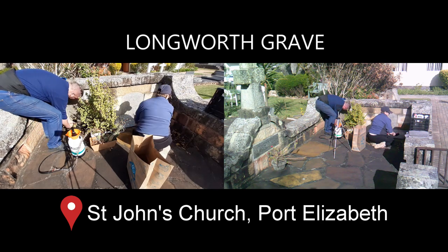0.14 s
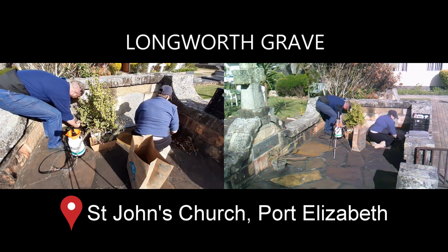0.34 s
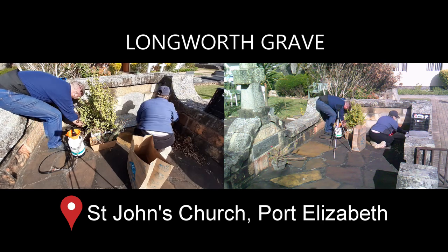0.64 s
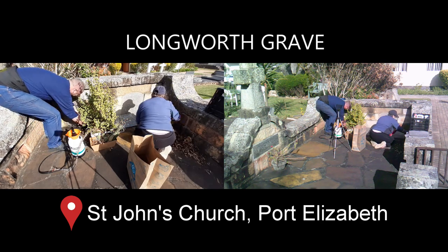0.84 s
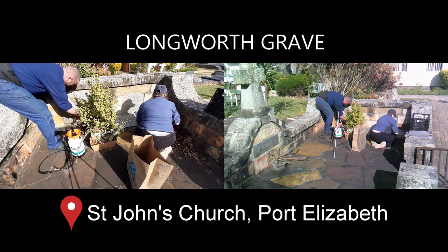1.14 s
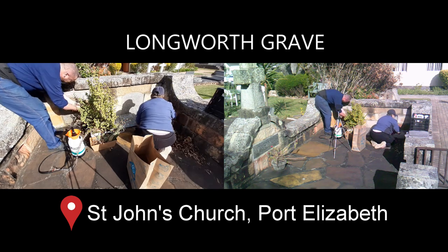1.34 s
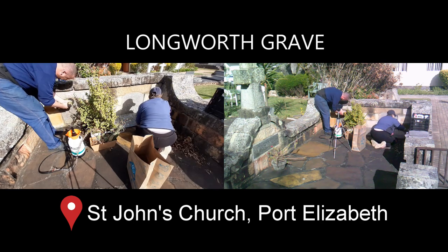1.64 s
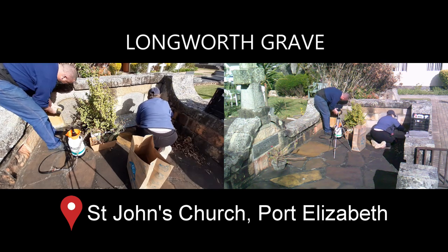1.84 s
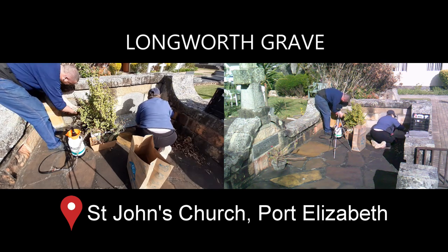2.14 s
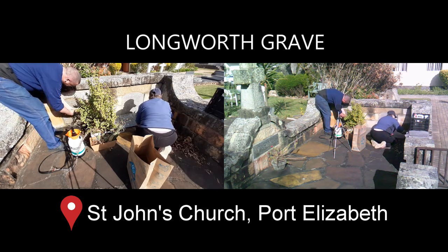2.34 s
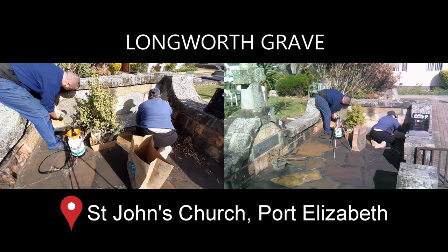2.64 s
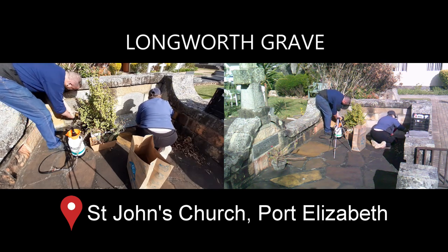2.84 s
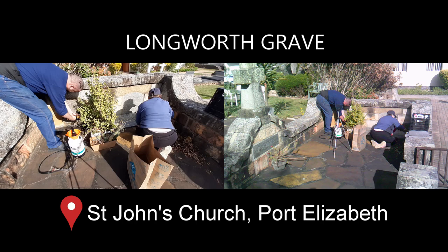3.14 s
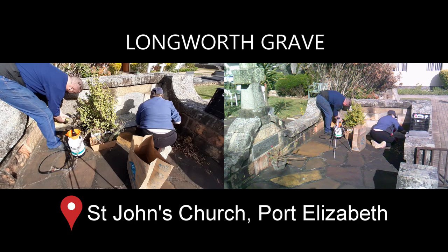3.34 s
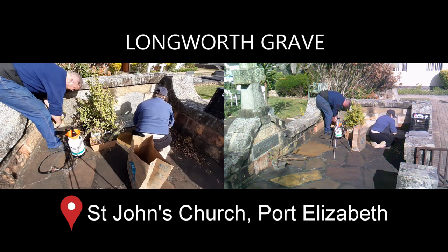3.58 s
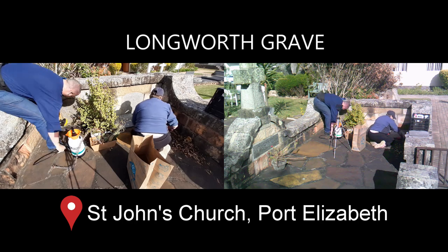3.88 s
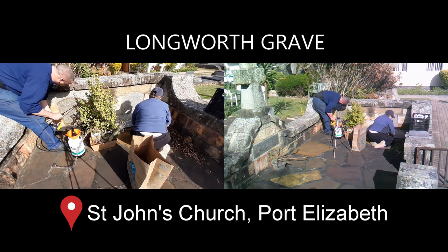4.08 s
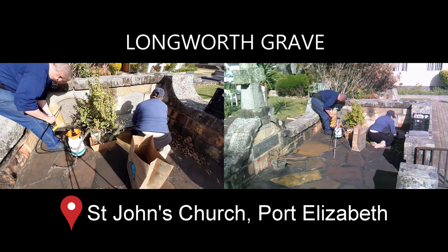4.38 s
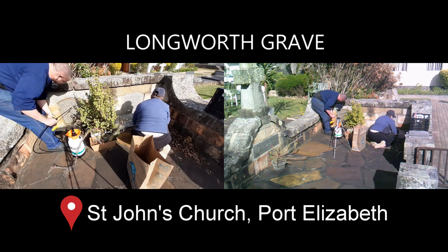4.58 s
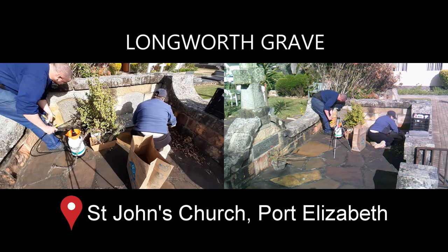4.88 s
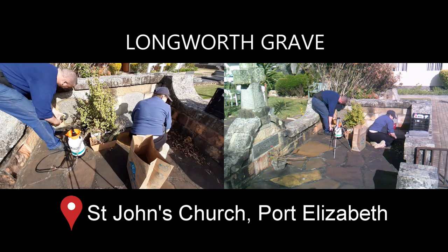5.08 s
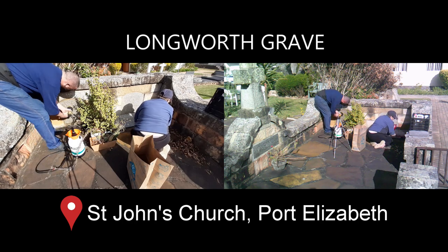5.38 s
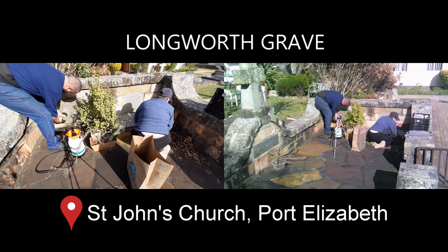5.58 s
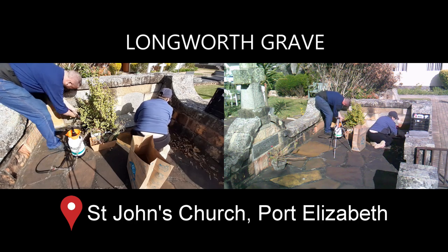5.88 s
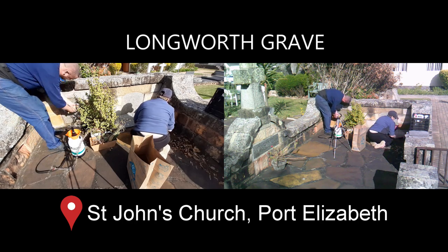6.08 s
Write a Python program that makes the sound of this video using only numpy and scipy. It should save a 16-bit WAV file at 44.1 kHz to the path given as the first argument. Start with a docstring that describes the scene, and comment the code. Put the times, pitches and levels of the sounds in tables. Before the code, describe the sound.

From 0 s a small geared electric tool is already running close by outdoors: a nasal hum near 900 Hz, a piercing gear whine near 2.8 kHz and its octave, wrapped in broad bright hiss. Pitch dips and wavers by several percent as it bears on the work, and the tone flickers roughly and shifts between left and right. A dull hollow knock lands around 1 s. From about 1.9 to 2.8 s a faint distant engine climbs in pitch. At 3.55 s the switch clicks and the tool dies within a tenth of a second. From 3.75 to 5.25 s dry bristles fizz and scrape stone in short strokes, strongest late, with small clicks and knocks near 5 s. At 5.29 s the tool clicks on, leaps up to speed and whines until 6.2 s, with soft hollow knocks. Low traffic rumble continues throughout; nearby walls add a very short, dull tail.

```python
"""Geared tool in a walled yard

A small geared electric tool whines (sines at multiples of its shaft speed) and hisses (coloured noise);
it stops and starts again. In the pause bristles brush over stone (gestures of noise); the switch clicks
(noise bursts) and things get knocked (ringing modes). Far traffic rumbles as slow-swelling noise and an
engine pulls away on rising harmonics. Two microphone ports hear it; walls add a tail to hiss and handling."""
import sys
import numpy as np
from scipy import signal
from scipy.fft import rfft, irfft
from scipy.io import wavfile
from scipy.ndimage import uniform_filter1d

SR = 44100
rng = np.random.default_rng(int(sys.argv[2]) if len(sys.argv) > 2 else 0)


def dump(signal):
    """Clip the signal to [-1, 1] and save it as 16-bit WAV at the path in sys.argv[1]."""
    limited = np.clip(np.atleast_2d(signal).T, -1, 1)
    pcm = np.round(limited * 32767).astype(np.int16)
    wavfile.write(sys.argv[1], SR, pcm)


N = 274302

# one table per run of the tool, its speed sagging under load: start_s, hum_hz
SPEED_RUNS = [
    [(0.0, 961), (0.015, 958), (0.065, 930), (0.1, 890), (0.115, 878), (0.13, 882), (0.15, 890),
     (0.195, 886), (0.229, 911), (0.269, 890), (0.314, 911), (0.359, 899), (0.399, 925), (0.454, 906),
     (0.504, 941), (0.529, 953), (0.559, 963), (0.579, 954), (0.609, 960), (0.683, 940), (0.893, 923),
     (1.003, 907.5), (1.043, 916), (1.102, 912), (1.137, 919), (1.172, 897), (1.222, 888), (1.302, 892),
     (1.352, 888), (1.407, 903), (1.432, 903), (1.482, 891.5), (1.527, 880), (1.551, 876), (1.656, 876),
     (1.671, 889), (1.761, 879), (1.826, 898), (1.896, 886), (1.966, 864), (2.0, 819), (2.035, 851),
     (2.065, 854), (2.08, 842), (2.115, 858), (2.135, 841), (2.22, 839), (2.24, 869), (2.28, 880),
     (2.385, 849), (2.42, 845), (2.464, 844.4), (2.484, 811), (2.504, 815), (2.554, 830), (2.584, 877),
     (2.594, 876), (2.604, 869), (2.629, 834), (2.644, 826), (2.654, 836), (2.674, 876), (2.684, 889),
     (2.714, 887), (2.764, 852), (2.789, 852), (2.809, 851), (2.834, 879.5), (2.873, 858), (2.888, 870),
     (2.903, 890), (2.948, 882), (2.968, 904), (2.988, 920), (3.028, 888), (3.073, 913), (3.138, 874),
     (3.218, 868), (3.263, 855), (3.317, 864.6), (3.357, 840.5), (3.397, 859), (3.417, 888), (3.447, 887),
     (3.497, 928), (3.517, 960), (3.527, 960), (3.56, 922)],
    [(5.292, 596), (5.302, 703), (5.312, 855), (5.333, 944), (5.348, 950), (5.363, 919), (5.383, 915),
     (5.408, 928), (5.428, 905), (5.448, 899), (5.478, 907), (5.498, 871), (5.507, 863), (5.522, 862),
     (5.547, 878), (5.587, 882), (5.617, 906), (5.687, 895.5), (5.717, 862), (5.742, 843), (5.762, 861),
     (5.787, 851), (5.852, 881), (5.907, 871), (5.932, 884), (5.966, 876), (5.986, 901), (6.016, 881),
     (6.036, 849), (6.066, 881.6), (6.086, 858), (6.106, 882), (6.121, 897), (6.131, 920), (6.156, 911),
     (6.181, 891), (6.22, 900)],
]
# the tool moves across the microphone: start_s, port_delay_ms, hum_lean_db (positive leans right)
PORT_PATH = [(0, 0.23, -7), (.3, 0.19, 2), (.6, 0.15, -1), (.9, 0.15, 3), (1.2, 0.16, 1), (1.5, .17, 5),
             (1.72, 0.21, -2), (1.9, 0.25, 10), (2.07, .21, -4), (2.25, 0.13, -8), (2.57, 0.27, 0.67),
             (2.73, 0.23, 3), (2.9, 0.17, -1), (3.06, 0.14, 1), (3.23, 0.22, 1.5), (3.56, 0.24, -4),
             (5.3, 0.22, -2), (5.47, 0.23, 3), (5.65, 0.26, 9), (5.9, 0.15, 7), (6.0, 0.23, 13),
             (6.06, 0.25, 10), (6.14, 0.091, -4), (6.22, 0.17, -1)]
TEETH, HUM_ORDER = 28, 9  # shaft orders of the gear mesh and of the hum
USUAL_HUM_HZ, USUAL_LAG_MS = 885, .19
STOP_S, RUN_DOWN_S, RUN_DOWN_DB = 3.558, 0.083, -20.5
START_S, RUN_UP_S = 5.288, 0.012
PATCHY_DB = .8  # drifting patches in the hiss and the fizz


def amp(db):
    """Decibels to gain."""
    return 10 ** (np.asarray(db) / 20)


def evened(x):
    """Scales to rms 1."""
    return x / np.sqrt(np.mean(x ** 2) + 1e-20)


def read(points, hz):
    """Reads a spectrum on a log-frequency axis."""
    f, value = np.transpose(points)
    return np.interp(np.log(hz + 1), np.log(f + 1), value)


def columns(tables, t):
    """Every column of the joined tables at times t."""
    s, *cols = np.concatenate(tables).T
    return [np.interp(t, s, c) for c in cols]


def running(tables, t, fade):
    """1 inside each table's span, fading at its ends, except at time 0 and at the end of the last table."""
    total = 0
    for table in tables:
        first_s, last_s = table[0][0], table[-1][0]
        since = t - first_s + fade * (first_s == 0)
        left = last_s - t + fade * (table is tables[-1])
        total = total + np.clip(np.minimum(since, left) / fade, 0, 1)
    return total


def wander(count, length):
    """Slow chance of rms 1, smoothed twice over length samples."""
    return evened(uniform_filter1d(uniform_filter1d(rng.standard_normal(count), length), length))


def noise(gain, same, patchy_db, size=512):
    """Two-channel noise of a given short-time gain and likeness, with drifting patches; gain 1 gives rms 1."""
    shape = (size // 2 + 1, 4 * N // size + 5)
    a, b, c, d, patches = rng.standard_normal(shape[::-1] + (5,)).T
    patches = uniform_filter1d(patches, size=6, axis=0)
    patches = evened(uniform_filter1d(patches, size=16, axis=1))
    same = np.clip(same, -1, 1)
    mid = np.sqrt(1 + same) * (a + 1j * b)
    side = np.sqrt(1 - same) * (c + 1j * d)
    z = np.array([mid + side, mid - side]) * amp(patchy_db * patches)
    plain = signal.istft(z[0], nperseg=size, noverlap=size * 3 // 4)[1]
    shaped = signal.istft(z * gain, nperseg=size, noverlap=size * 3 // 4)[1]
    return shaped[:, :N] / plain.std()


def add(mix, s, sound, pan_db):
    """Mixes a short sound in at s seconds; positive pan is louder on the left."""
    part = mix[:, round(s * SR):][:, :len(sound)]
    part += sound[:part.shape[1]] * amp([[pan_db / 2], [-pan_db / 2]])


def gestures(rows, t, rise, fall):
    """Summed envelopes: rise, hold, fall."""
    total = 0
    for s, length, db in rows:
        opening = np.clip((t - s) / rise, 0, 1)
        closing = np.exp(-np.maximum(t - s - length + 2 * fall, 0) / fall)
        total = total + amp(db) * opening * closing
    return total


def whine(flutter, jitter, flicker_db):
    """Shaft orders as sines; the shaft speed flutters and jitters, and each weak order comes and goes."""
    # main tones before run-down and slack: start_s, hum_db, mesh_db, octave_db,
    # strand_db (upper strand beside the mesh octave), half_mesh_db
    tone_levels = [(0.0, -47, -43.0, -52, -48.5, -70.5), (0.07, -43.5, -39, -47, -42, -66),
                   (0.14, -50, -53, -36.0, -40.0, -74), (0.21, -44, -45, -38.5, -45.0, -64),
                   (0.28, -47, -40, -35.5, -46, -60), (0.35, -46, -41.0, -38, -44.5, -48),
                   (0.42, -45.5, -43.5, -39, -40, -55.5), (0.49, -47.5, -38.0, -41, -41, -52),
                   (0.56, -53, -46, -44, -43, -51), (0.63, -50, -46, -38, -42.0, -59),
                   (0.7, -46.5, -44.5, -40.5, -38, -64), (0.77, -51, -43, -41.5, -46.0, -55),
                   (0.84, -47.5, -38, -39, -46, -51), (0.91, -49, -40.5, -45.5, -51, -71.0),
                   (0.98, -41, -41, -39, -46.0, -52), (1.05, -39, -37, -49, -40, -56),
                   (1.12, -37, -45.5, -44.5, -41, -52), (1.19, -40.0, -36, -42.5, -49.5, -54),
                   (1.26, -43.5, -47, -41.5, -51, -60), (1.33, -43.5, -43, -43, -47.0, -59),
                   (1.4, -41.5, -37, -46, -38, -50), (1.47, -37.5, -38.5, -44, -45, -49),
                   (1.54, -42.5, -40, -49, -52, -71.0), (1.61, -42.0, -44, -42, -52.0, -48),
                   (1.68, -39.5, -40.5, -43, -52, -52), (1.75, -54, -39, -42.0, -39, -53),
                   (1.82, -53, -38, -46, -45, -50), (1.89, -44.5, -41.5, -44, -44.5, -50),
                   (1.96, -42.5, -39, -41.0, -43.5, -52), (2.03, -49, -39, -42, -46, -60.0),
                   (2.1, -49.0, -43, -45, -41.0, -65.5), (2.17, -50.5, -40.5, -44, -46, -75.5),
                   (2.24, -47.5, -44, -45, -49.5, -56.5), (2.31, -41.5, -57, -43, -56, -59),
                   (2.38, -46.5, -45, -42, -51, -73.0), (2.45, -57, -43, -36, -42, -72.5),
                   (2.52, -46, -34, -40, -40.5, -62), (2.59, -46.5, -52, -43.0, -40, -58.5),
                   (2.66, -45, -45, -45, -50, -74.5), (2.73, -44.5, -41, -39, -42.0, -73.5),
                   (2.8, -52.5, -39.5, -38.5, -46, -72), (2.87, -42.5, -49, -40, -47, -71.0),
                   (2.94, -43.5, -43, -38, -39, -54.5), (3.01, -39, -42.5, -45, -49.0, -55),
                   (3.08, -40.5, -40, -37.0, -49, -54.5), (3.15, -42.5, -40.5, -38, -40, -61),
                   (3.22, -40.0, -46.5, -43, -42, -69), (3.29, -40.5, -37, -38.5, -40, -70.5),
                   (3.36, -46, -50.5, -35, -44.5, -58), (3.43, -38.5, -43.0, -38.5, -46.0, -73),
                   (3.5, -44.5, -43.5, -44.5, -49.5, -67), (5.3, -52.5, -41, -41, -54.5, -70),
                   (5.37, -49, -44.5, -48, -44.5, -51), (5.44, -42, -39.5, -44, -50.5, -49),
                   (5.51, -43.5, -40.5, -40.0, -51, -59.0), (5.58, -40.5, -42.5, -42, -54, -54.0),
                   (5.65, -41, -37, -47, -50, -57), (5.72, -44, -48, -45, -49.0, -61.5),
                   (5.79, -40.5, -32, -39, -45.0, -58), (5.86, -45, -44, -47, -54, -76.0),
                   (5.93, -47, -45, -49, -53, -72.0), (6.0, -47.5, -37.5, -47, -54, -56.0),
                   (6.07, -46.0, -40.5, -55, -53, -54), (6.14, -39, -41, -50, -51.0, -70.5),
                   (6.21, -41, -44.5, -60, -55.5, -59.0), (6.22, -31, -44.5, -54, -55.0, -60.5)]
    # phase by which the left leads: start_s, hum_turns, mesh_turns, octave_turns
    left_leads = [(0.0, -0.029, -0.04, -0.53), (0.07, -0.39, -0.14, 0.012), (0.14, -0.48, -0.19, 0.13),
                  (0.21, -0.46, -0.2, 0.01), (0.28, -0.51, -0.32, -0.0), (0.35, -0.41, -0.6, 0.0),
                  (0.42, -0.22, -0.81, -0.0), (0.49, -0.3, -0.54, -0.0), (0.56, -0.074, -0.22, 0.13),
                  (0.63, -0.22, -0.058, -0.15), (0.7, -0.13, 0.17, 0.0), (0.77, -0.28, 0.31, 0.036),
                  (0.84, -0.3, 0.41, 0.31), (0.91, -0.16, 0.78, 0.044), (0.98, -0.22, 0.53, 0.33),
                  (1.05, 0.01, 0.51, 0.47), (1.12, -0.17, 0.73, 0.26), (1.19, -0.14, 0.49, 0.15),
                  (1.26, 0.048, 0.58, -0.2), (1.33, -0.17, 0.47, 0.01), (1.4, -0.05, 0.21, -0.07),
                  (1.47, -0.11, 0.31, -0.2), (1.54, -0.19, 0.5, 0.24), (1.61, -0.26, 0.5, -0.41),
                  (1.68, -0.15, 0.84, 0.021), (1.75, -0.37, 0.67, -0.33), (1.82, -0.74, 0.37, -0.73),
                  (1.89, -0.56, 0.17, -0.37), (1.96, -0.79, 0.44, -0.11), (2.03, -0.88, 0.29, -0.12),
                  (2.1, -0.68, 0.65, 0.044), (2.17, -0.73, 0.29, -0.01), (2.24, -0.92, 0.29, 0.01),
                  (2.31, -0.79, 0.51, -0.16), (2.38, -0.72, 0.55, -0.034), (2.45, -1.06, 0.35, 0.0018),
                  (2.52, -0.82, 0.51, -0.05), (2.59, -0.81, 0.42, -0.16), (2.66, -0.095, 0.64, 0.0068),
                  (2.73, -0.23, 0.77, 0.28), (2.8, -0.021, 0.45, 0.0), (2.87, 0.4, 0.39, -0.015),
                  (2.94, 0.12, 0.62, 0.0), (3.01, 0.052, 0.71, -0.052), (3.08, 0.017, 0.26, 0.15),
                  (3.15, 0.27, 0.66, -0.06), (3.22, 0.25, 0.49, -0.058), (3.29, 0.19, 0.53, 0.094),
                  (3.36, 0.056, -0.035, -0.11), (3.43, 0.34, 0.25, 0.04), (3.5, 0.23, -0.0047, 0.31),
                  (5.3, 0.25, -0.31, -0.11), (5.37, -0.15, 0.22, 0.09), (5.44, -0.13, 0.77, -0.054),
                  (5.51, -0.22, 0.07, -0.061), (5.58, -0.34, -0.28, 0.18), (5.65, -0.19, -0.14, -0.17),
                  (5.72, -0.32, 0.23, -0.28), (5.79, -0.22, 0.4, -0.0049), (5.86, -0.21, 0.78, 0.01),
                  (5.93, -0.24, 0.21, 0.052), (6.0, -0.26, 0.65, -0.16), (6.07, -0.82, 0.64, 0.09),
                  (6.14, -0.78, 0.62, 0.13), (6.21, -0.78, 0.69, 0.089), (6.22, -0.74, 0.64, 0.03)]
    # weaker shaft orders below and around the mesh: order; level_db relative to the mesh
    near_mesh, near_mesh_db = [18, 26, 27, 29, 30, 31], [-20, -16, -14, -21, -16, -18]
    # orders around the second and third mesh multiple: order; level_db relative to the mesh octave
    near_octave, near_octave_db = [49, 52, 54, 60, 63, 64, 84, 86], [-14, -14, -10, -14, -14, -13, -10, -9]
    # orders that swell or fade with the load: order; level_db at usual speed, slope_db per 1% of sag
    loaded_orders, loaded_levels = [12, 13, 15, 16, 17, 21, 22, 3, 7, 4.5], [(-64.5, 0.29), (-63, 0), (-60.5, -0.12),
                                                           (-63.5, -0.5), (-59.5, 1.6), (-60.5, 0),
                                                           (-58, 0.38), (-70, 0.81), (-64.5, 0.39),
                                                           (-67.5, 0.67)]
    engaged_hum_hz, slack_db_per_hz = 840, .1  # at the start, gear tones are faint below this speed
    flutter_db_per_sag = .8  # more flutter under load: dB for each 1% of sag
    drift_turns = .2  # weak orders drift in phase between the ports
    hum_drift_db, mesh_drift_db, octave_drift_db = 1.5, 2.5, 2.5  # chance drift between left and right
    tone_wobble_db = 1.5
    grain_db, mesh_grain_db = 2.5, 1.5  # quick chatter of the gear tones

    t, side = np.arange(N) / SR, np.array([[.5], [-.5]])
    hum_hz = columns(SPEED_RUNS, t)[0]
    hum_db, mesh_db, octave_db, strand_db, half_db = columns([tone_levels], t)
    lag_ms, lean_db = columns([PORT_PATH], t)

    slack_db = slack_db_per_hz * np.maximum(engaged_hum_hz - hum_hz, 0) * (t > START_S)
    run_down = np.clip(1 - (STOP_S - t) / RUN_DOWN_S, 0, 1)
    slack_db -= RUN_DOWN_DB * run_down ** 2 * (t < START_S)
    mesh_db, octave_db, strand_db = mesh_db - slack_db, octave_db - slack_db, strand_db - slack_db

    sag = np.clip(100 * (1 - uniform_filter1d(hum_hz, size=6000) / USUAL_HUM_HZ), -8, 6)  # percent
    slow_flutter = flutter * amp(flutter_db_per_sag * sag) * wander(N, length=500)
    shaft_hz = hum_hz / HUM_ORDER * (1 + slow_flutter + jitter * wander(N, length=90))
    turns = np.cumsum(shaft_hz) / SR
    lead = shaft_hz * lag_ms / 1000  # shaft turns within the port delay

    def order(k, db, pan_db=0, ahead=None, wobble_db=flicker_db):
        """One sine at k times the shaft speed, wobbling in level."""
        if ahead is None:
            ahead = k * lead + drift_turns * wander(N, length=2000)
        phase = 2 * np.pi * (k * turns + side * ahead + rng.random())
        level_db = db + side * pan_db + wobble_db * wander(N, length=1200)
        return np.sqrt(2) * amp(level_db) * np.sin(phase)

    def grain(depth_db):
        """Chatter in dB."""
        return depth_db * wander(N, length=200)

    hum_ahead, mesh_ahead, octave_ahead = columns([left_leads], t)
    hum_pan = hum_drift_db * wander(N, length=3000) - lean_db
    mesh_pan = mesh_drift_db * wander(N, length=3000)
    octave_pan = octave_drift_db * wander(N, length=3000)
    out = order(HUM_ORDER, hum_db, hum_pan, hum_ahead, wobble_db=2.0)
    out += order(TEETH, mesh_db + grain(mesh_grain_db), mesh_pan, mesh_ahead, tone_wobble_db)
    out += order(2 * TEETH, octave_db + grain(grain_db), octave_pan, octave_ahead, tone_wobble_db)
    out += order(2 * TEETH + 2, strand_db + grain(grain_db), wobble_db=tone_wobble_db)
    out += order(TEETH / 2, half_db, wobble_db=tone_wobble_db)
    for k, db in zip(near_mesh, near_mesh_db):
        out += order(k, mesh_db + db)
    for k, db in zip(near_octave, near_octave_db):
        out += order(k, octave_db + db)
    for k, (db, slope_db) in zip(loaded_orders, loaded_levels):
        out += order(k, db + slope_db * sag)
    return out * running(SPEED_RUNS, t, fade=0.014)


def hiss():
    """Broad noise; arriving from left and right alike, the port delay combs its likeness."""
    # relative colour before humps and casing: pitch_hz, level_db per Hz
    hiss_colour = [(250, -15), (500, -17.5), (1000, -4), (1500, -2.5), (2300, -5), (3500, -1.5),
                   (5000, -3.5), (7300, -1.5), (10000, -2), (16000, 0)]
    # hiss gathers round the mesh: mesh_multiple, width_hz, level_db
    mesh_humps = [(.5, 420, -1.5), (1, 330, 5.5), (2, 2100, 1.5)]
    # resonances of the casing: pitch_hz, width_hz, level_db
    casing_modes = [(1620, 130, 3), (5500, 600, 4), (6650, 250, 2), (8550, 520, 5.5)]
    # share that is not diffuse: pitch_hz, share (0-1)
    alike_share = [(300, 1), (1500, 1), (3500, 1), (6500, 0.52), (9000, 0.01), (13000, .05)]
    base_db, db_per_ms = -30, 12  # louder when the tool points along the ports
    low_hold, low_most_db = 0.81, 17  # below 2 kHz it holds against level changes, up to a limit

    hz = np.fft.rfftfreq(512, 1 / SR)[:, None]
    t = np.arange(N // 128 + 5) * 128 / SR  # frame times
    mesh_hz = columns(SPEED_RUNS, t)[0] * TEETH / HUM_ORDER
    lag_ms = columns([PORT_PATH], t)[0]
    down = np.clip(1 - (STOP_S - t) / RUN_DOWN_S, 0, 1)
    up = np.maximum(t - START_S, 1e-4) / RUN_UP_S
    change_db = db_per_ms * (lag_ms - USUAL_LAG_MS)
    change_db += np.where(t < STOP_S, RUN_DOWN_DB * down ** 2, 20 * np.log10(1 - np.exp(-up)))
    low_db = np.minimum(-low_hold * change_db, low_most_db)

    colour_db = read(hiss_colour, hz) + low_db / (1 + (hz / 2000) ** 4)
    colour_db += sum(db * np.exp(-((hz - k * mesh_hz) / width) ** 2) for k, width, db in mesh_humps)
    colour_db += sum(db * np.exp(-((hz - mode) / width) ** 2) for mode, width, db in casing_modes)
    same = read(alike_share, hz) * np.cos(2 * np.pi * hz * lag_ms / 1000)
    on = (t < STOP_S) | (t > START_S)
    air = noise(amp(colour_db + base_db + change_db) * on, same, patchy_db=PATCHY_DB)
    return air * amp(0.4 * wander(N, length=25))  # ragged from one instant to the next


def brushing():
    """Bristles fizz in the treble; each stroke that bears down scrapes lower, starting more softly."""
    # sweeps of the bristles, before colouring: start_s, length_s, level_db
    sweep_rows = [(3.745, 0.19, -68), (3.856, 0.14, -55.5), (4.045, 0.75, -51), (4.75, 0.21, -48.5),
                  (4.91, 0.19, -61), (5.08, 0.16, -48), (5.255, 0.036, -52)]
    # strokes that bear down on the stone, before colouring: start_s, length_s, level_db
    stroke_rows = [(3.738, 0.22, -70.5), (3.848, 0.12, -69), (4.022, 0.085, -61), (4.22, 0.062, -59.5),
                   (4.32, 0.047, -66), (4.36, 0.12, -60), (4.533, 0.083, -59.5), (4.765, 0.081, -57),
                   (4.9, 0.092, -57), (4.966, 0.18, -70), (5.084, 0.13, -52), (5.203, 0.12, -73)]
    # relative colours of the two: pitch_hz, level_db per Hz
    fizz_colour, scrape_colour = [(2500, -31), (5000, -16.5), (8000, -10), (12000, 0), (16000, 1.5)], [(600, -18), (1500, -5.5), (2700, -1), (6000, -1.5),
                                                (9000, -2.5), (16000, -9)]

    t, hz = np.arange(N) / SR, np.fft.rfftfreq(512, 1 / SR)[:, None]
    sweep = gestures(sweep_rows, t, rise=.016, fall=0.033)
    press = gestures(stroke_rows, t, rise=0.023, fall=0.015)
    fizz = noise(amp(read(fizz_colour, hz) + 4.5), .05, patchy_db=PATCHY_DB)
    scrape = noise(amp(read(scrape_colour, hz) + 8.0), 0.045, patchy_db=-1.5)
    rough_db = 0.99 * wander(N, length=120) + 1.2 * wander(N, length=1800)
    return (sweep * fizz + press * scrape) * amp(rough_db)


def handling():
    """Knocks ring the hollow modes; clicks are short bursts of noise in the tool body."""
    # dull knocks on a hollow thing: start_s, peak_db before pan, pan_db (left over right)
    knock_rows = [(0.970, -29.5, 5), (1.019, -41, -1.5), (3.548, -44.5, 3), (5.499, -46, 3),
                  (5.796, -43, -8), (5.873, -42, -8), (6.063, -34.5, 5)]
    # modes of the hollow thing: pitch_hz, relative level_db, t60_s
    hollow_modes = [(253, -3.5, 0.097), (330, -13.5, .06), (454.3, -7.5, 0.12), (604, -1, .05),
                    (673, 3, 0.047), (713, 7.5, 0.1), (1520, -14, 0.066)]
    # scuffs and clicks: peak_s, relative level_db, centre_hz, width_octaves, rise_s, fall_s,
    # pan_db (left over right)
    click_rows = [(0.974, -33.5, 520, 0.59, 0.0061, 0.012, -5),
                  (3.549, -28.5, 2304, 1.22, 0.0037, 0.003, 2),
                  (3.571, -49.5, 1311, 0.66, 0.0036, 0.038, 0),
                  (3.614, -42, 1510, 0.55, 0.0084, 0.0035, -0.5), (3.854, -49, 803, 0.87, 0.009, 0.044, 3),
                  (4.762, -50.5, 6950, 1.3, 0.00056, 0.006, -1), (4.797, -53, 2300, 0.44, 0.0044, 0.008, 0),
                  (4.966, -32, 456, 0.5, 0.0043, 0.008, -3), (4.967, -29.5, 1360, 1.07, 0.0039, 0.0047, 2),
                  (5.027, -38.5, 950, 0.8, 0.0012, 0.0042, 1),
                  (5.063, -27.5, 4700, 2.5, 0.0034, 0.0077, -4.5), (5.1, -42, 550, 0.79, 0.0076, 0.011, -2),
                  (5.133, -48, 906, 1, 0.005, 0.0064, -2), (5.268, -42, 1988, 1.8, 0.0026, 0.0082, 1),
                  (5.297, -34.5, 1188, 1.9, 0.0037, 0.0037, 1)]
    # what clicks ring in: pitch_hz, width_hz, level_db
    body_modes = [(495, 170, 11), (660, 150, 8), (1230, 140, 9), (1620, 120, 9), (1950, 150, 7),
                  (2500, 300, 6), (4750, 950, 6)]

    out, t = np.zeros((2, N)), np.arange(4096) / SR
    ring = sum(amp(db - 60 * t / t60) * np.sin(2 * np.pi * f * t) for f, db, t60 in hollow_modes)
    ring = ring * (1 - np.exp(-t / 0.0038))  # soft onset
    for s, db, pan_db in knock_rows:
        add(out, s, amp(db) * ring / abs(ring).max(), pan_db)

    f = np.fft.rfftfreq(len(t), 1 / SR) + 1
    body = amp(sum(db / (1 + (2 * (f - hz) / width) ** 2) for hz, width, db in body_modes))
    for s, db, hz, octaves, rise, fall, pan_db in click_rows:
        colour = body * np.exp(-.5 * (np.log2(f / hz) / octaves) ** 2)
        late = t - 5 * rise  # time from the peak
        shape = np.exp(-abs(late) / np.where(late < 0, rise, fall))
        burst = evened(irfft(rfft(rng.standard_normal(len(t))) * colour)) * shape
        add(out, s - 5 * rise, amp(db) * burst / 2, pan_db)
    return out


def walls(x, wet_db, t60, top_hz):
    """The yard walls give back a short, dull tail: low-passed noise dying by 60 dB in t60 seconds."""
    t = np.arange(8192) / SR
    dull = signal.lfilter(*signal.butter(1, top_hz, fs=SR), rng.standard_normal((2, len(t))))
    tail = dull * amp(-60 * t / t60)
    echo = signal.fftconvolve(x, tail / np.linalg.norm(tail[0]), axes=1)[:, :N]
    return x + amp(wet_db) * echo


def engine():
    """A few rough harmonics of a base rate, rising as the far engine gathers speed."""
    # the engine pulls away: start_s, base_hz, level_db before the harmonic levels
    pull_away = [(1.85, 72.55, -77), (2.0, 78, -59), (2.15, 85.8, -66), (2.35, 99.97, -60.5),
                 (2.5, 106.5, -56), (2.65, 114.2, -60), (2.8, 120.8, -75)]
    # harmonics: multiple of base_hz; relative level_db
    multiples, multiples_db = [2, 3, 4, 5], [1.5, -2, -0.5, -10]
    pan_db = 6  # left over right

    t = np.arange(N) / SR
    hz, db = columns([pull_away], t)
    turns = np.cumsum(hz * (1 + 0.014 * wander(N, length=800))) / SR
    tone = 0
    for k, d in zip(multiples, multiples_db):
        tone = tone + amp(d + 3.7 * wander(N, length=1500)) * np.sin(2 * np.pi * k * turns)
    on = running([pull_away], t, fade=.05) * (t < pull_away[-1][0])
    return tone * amp(db) * on * amp([[pan_db / 2], [-pan_db / 2]])


def yard():
    """Far traffic as noise: deep rumble and a drone that swell on their own."""
    # relative colour of the traffic: pitch_hz, level_db per Hz
    traffic_colour = [(13, -56), (22, -3.5), (62, -0.5), (147, -18), (202, -16), (262, -24), (313, -19),
                      (382, -30), (458, -26), (696, -26.5), (833, -25), (1240, -30), (2450, -42),
                      (2600, -50), (3380, -68), (5720, -120)]
    # left-right likeness: pitch_hz, likeness (-1 to 1)
    likeness = [(60, 0.904), (180, 0.96), (550, 0.58), (1650, 0.33), (4970, 0.36), (15000, 0.036)]
    # slow swell: start_s, deep_db, drone_db
    traffic_swell = [(0, 0, -5), (1.2, 0.5, 0.5), (2.2, 2.5, 5), (3, -2.5, 0), (4.2, 1, 0.5), (5.6, -1, 0),
                     (6.22, -3, 1.5)]
    level_db = -47.5  # before the swells

    hz, count = np.fft.rfftfreq(2048, 1 / SR)[:, None], N // 512 + 5
    deep = 1 / (1 + (hz / 125) ** 4)
    high = 1 / (1 + (500 / (hz + 1)) ** 4)
    slow_deep_db, slow_drone_db = columns([traffic_swell], np.arange(count) * 512 / SR)
    deep_db = slow_deep_db + 0.9 * wander(count, length=8)
    drone_db = slow_drone_db + 2 * wander(count, length=8)
    swell_db = deep * deep_db + (1 - deep) * (1 - high) * drone_db
    shape = evened(amp(read(traffic_colour, hz)))
    return amp(level_db) * noise(shape * amp(swell_db), read(likeness, hz), patchy_db=1.5, size=2048)


def scene():
    """Everything in the yard; the steady tones carry their echoes in their own levels."""
    near = walls(hiss() + brushing() + handling(), wet_db=-11.0, t60=0.07, top_hz=4564)
    # flutter (slow) and jitter (quick) are shares of the speed
    tones = whine(flutter=.001, jitter=.0016, flicker_db=3)
    return near + tones + yard() + engine()


def record(dry):
    """Faint microphone hiss, then the band limit."""
    self_noise_db, edge_hz = -83, 15900
    wet = dry + amp(self_noise_db) * rng.standard_normal(dry.shape)
    band = signal.firwin(511, edge_hz, window=("kaiser", 9), fs=SR)
    return signal.oaconvolve(wet, band[None], "same")


dry = scene()
out = record(dry)
dump(out)
```